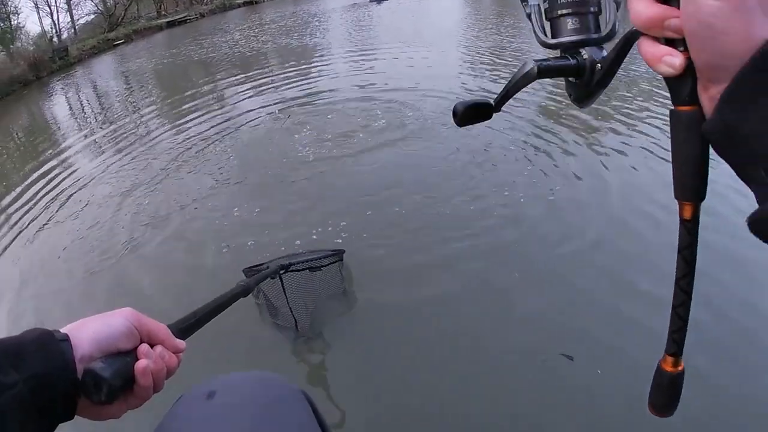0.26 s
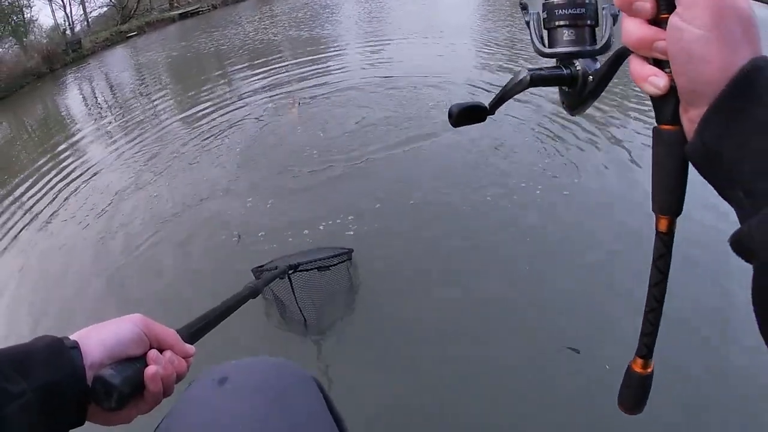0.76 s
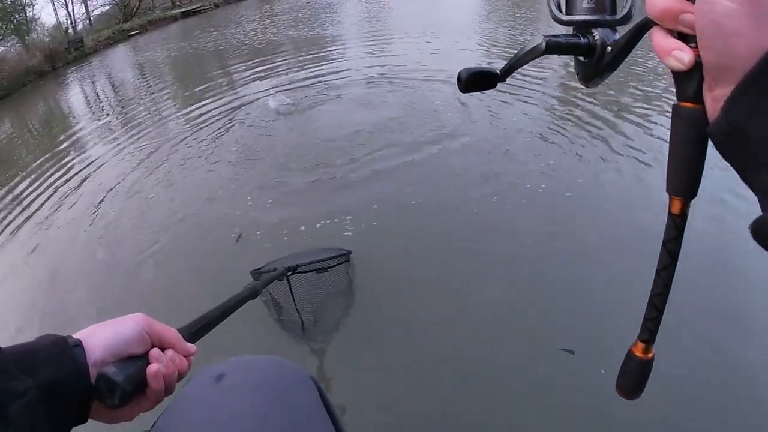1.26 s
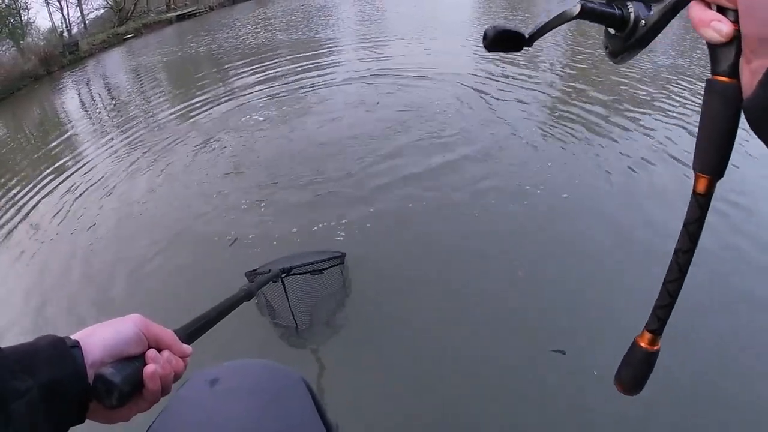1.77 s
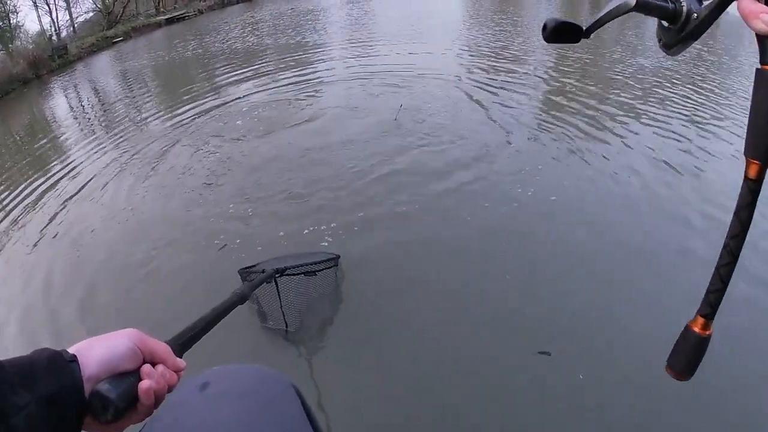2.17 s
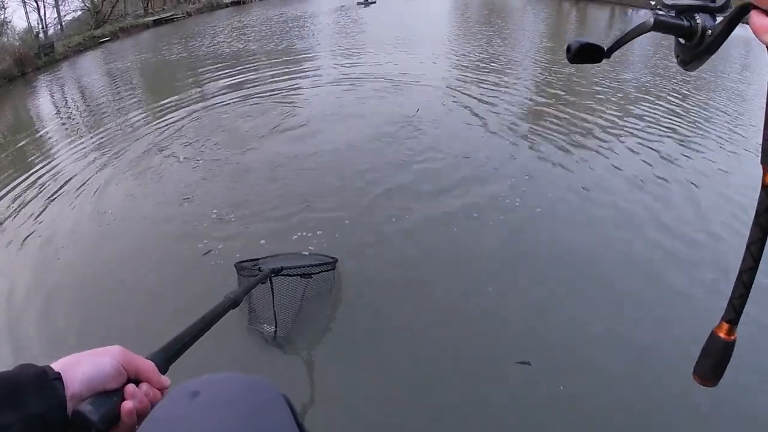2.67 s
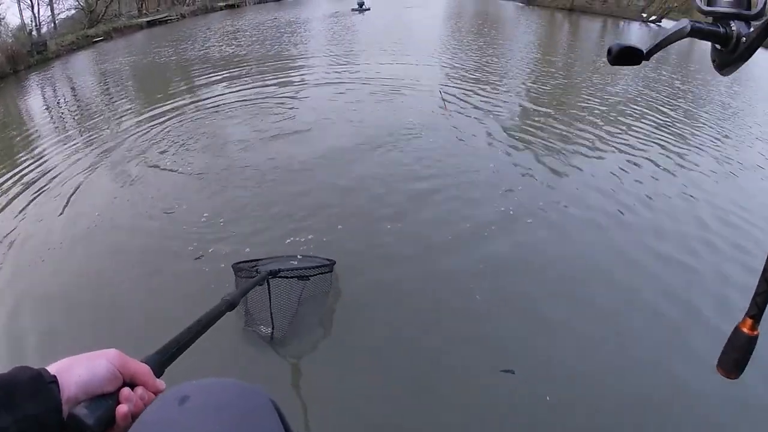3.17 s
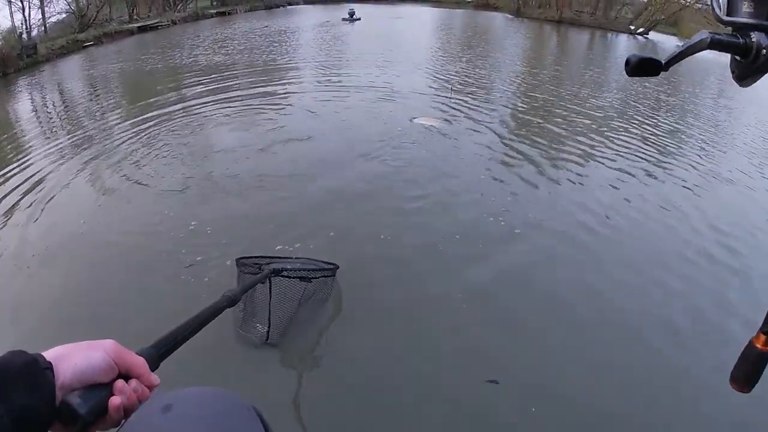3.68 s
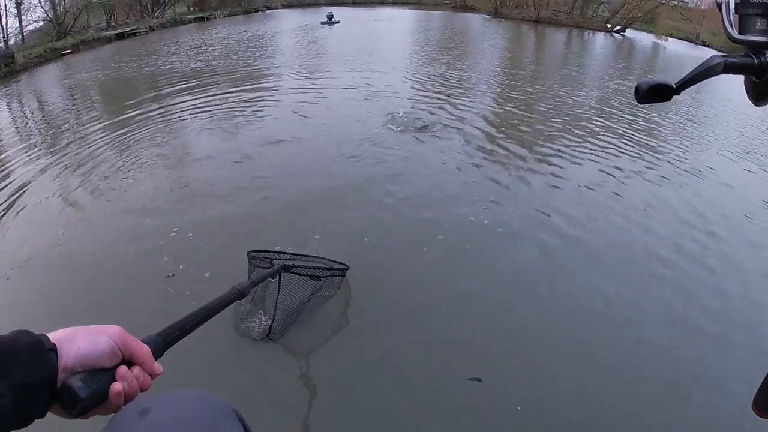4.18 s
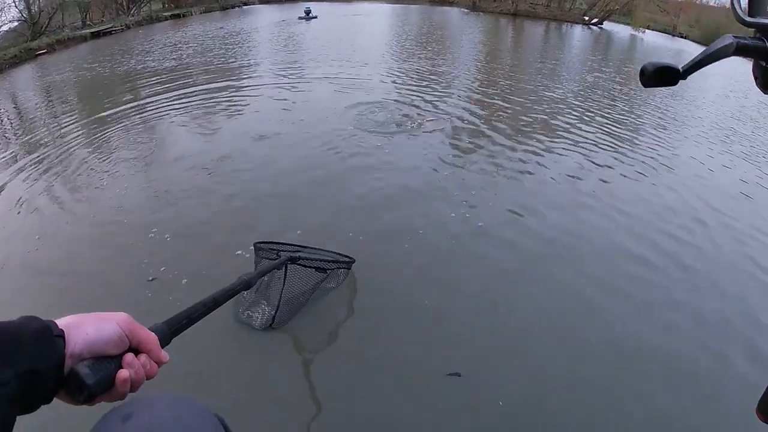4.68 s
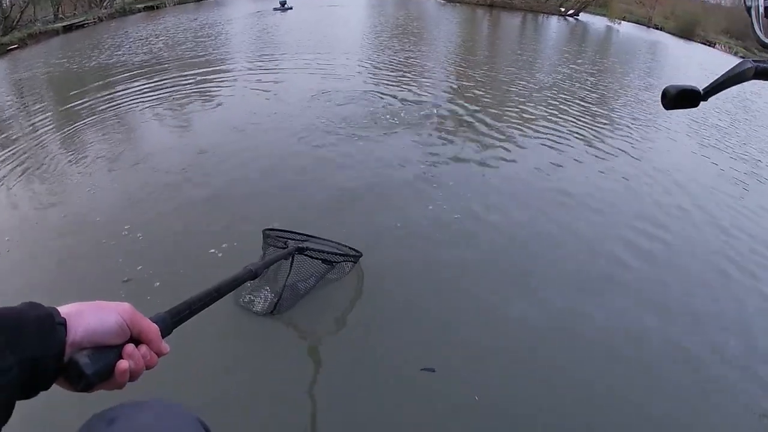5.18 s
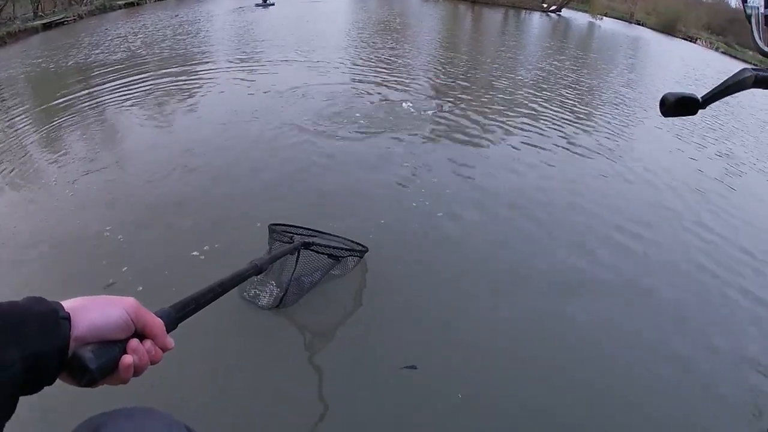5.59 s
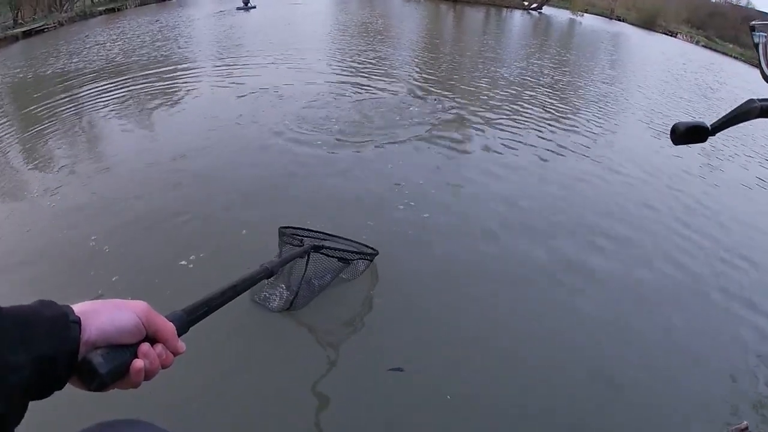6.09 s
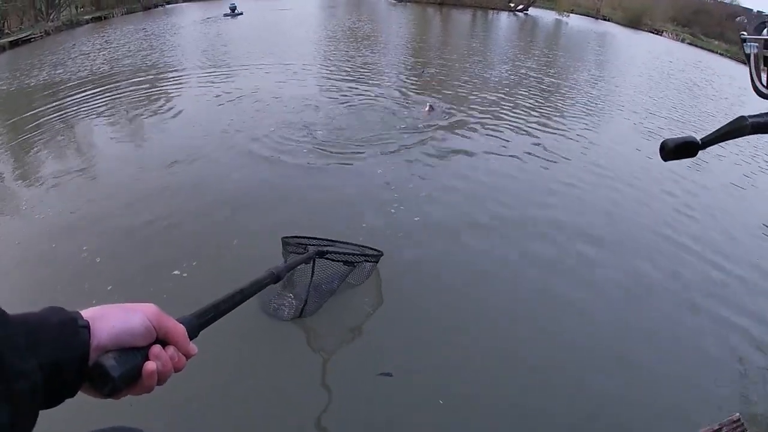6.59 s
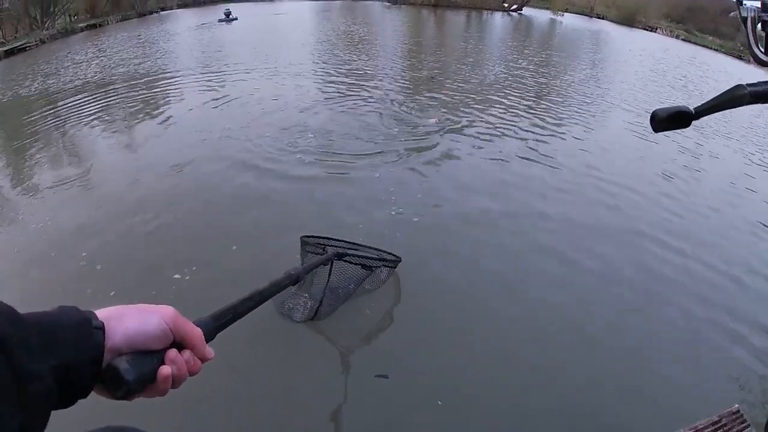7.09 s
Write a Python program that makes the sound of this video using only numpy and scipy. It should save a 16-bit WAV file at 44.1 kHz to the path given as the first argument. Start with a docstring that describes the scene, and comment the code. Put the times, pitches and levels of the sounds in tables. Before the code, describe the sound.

A hooked fish splashes at the surface of a lake, churning up bubbles and ticking drops, then gives one heavy slosh with deep glugs. In a lull, songbirds call faintly from the bank. The fish thrashes again in a run of sharp splashes, and as it settles, gusts buffet the microphone while birds whistle softly. Distant traffic drones and hisses throughout.

```python
"""A hooked fish thrashes at the surface of a lake, over the drone and hiss of a far road and light wind.
From the start, tail beats churn the water into ringing bubbles and spray, and drops tick back in.
At 1.5 s a heavy beat sloshes and big air pockets glug. In the lull, from 2.5 s, songbirds call
from the bank. The fish thrashes again from 4 s to 6 s; then gusts buffet the microphone
while a second bird whistles."""
import sys
import numpy as np
from scipy import signal
from scipy.fft import rfft, irfft, next_fast_len
from scipy.io import wavfile
from scipy.ndimage import uniform_filter1d, map_coordinates

SR = 44100
rng = np.random.default_rng(int(sys.argv[2]) if len(sys.argv) > 2 else 0)


def int16_out(signal):
    """Quantize to a 16-bit WAV file."""
    q = np.round(np.clip(np.atleast_2d(signal).T, -1, 1) * 32767)
    wavfile.write(sys.argv[1], SR, q.astype(np.int16))


N = 323694
TIME_S = np.arange(N) / SR


def amp(db):
    return 10 ** (np.asarray(db) / 20)


def unit(x):
    return x / np.sqrt(np.mean(x ** 2) + 1e-20)


def sine(hz):
    return np.sin(2 * np.pi * np.cumsum(hz) / SR)


def curves(rows, outside=None):
    """Each column after t/s, interpolated per sample."""
    times_s, *columns = np.transpose(rows)
    return [np.interp(TIME_S, times_s, column, outside, outside) for column in columns]


def wobble(rate_hz):
    """Smooth random curve, rate_hz knots a second."""
    knots = rng.standard_normal(int(N * rate_hz / SR) + 4)
    return map_coordinates(knots, [TIME_S * rate_hz])


def coloured(x, spectrum):
    """Filter by (f/Hz, gain/dB) points on a log frequency axis."""
    size = next_fast_len(N + 8192)
    hz, db = np.transpose(spectrum)
    gain = amp(np.interp(np.log(np.fft.rfftfreq(size, 1 / SR) + 1), np.log(hz + 1), db))
    return irfft(rfft(x, size) * gain, size)[:N]


def rush(spectrum, patchy_db):
    """Coloured noise, rms 1, with random gain patches in time and frequency."""
    bins = signal.stft(rng.standard_normal(N + 512), nperseg=512)[2]
    patches = uniform_filter1d(rng.standard_normal(bins.shape), size=6, axis=0)
    patches = unit(uniform_filter1d(patches, size=14, axis=1))
    noise = signal.istft(bins * amp(patchy_db * patches), nperseg=512)[1][:N]
    return unit(coloured(noise, spectrum))


def steady(x, samples):
    """Even out the slow level, keep the grain."""
    return x / np.sqrt(np.abs(uniform_filter1d(x ** 2, size=samples)) + 0.028)


def place(start_s, waves):
    """Sum the rows of waves, each at its start time."""
    index = np.round(start_s * SR).astype(int)[:, None] + np.arange(waves.shape[1])
    return np.bincount(index.ravel(), waves.ravel(), N)[:N]


def bubbles(start_s, db, hz, cycles, rise, samples):
    """Damped sines, rising in pitch as they near the surface. One life = cycles to fall 26 dB."""
    db, hz, cycles, rise = (np.reshape(v, (-1, 1)) for v in (db, hz, np.maximum(cycles, 1), rise))
    lives = np.arange(samples) / SR * hz / cycles
    phase = 2 * np.pi * cycles * lives * (1 - rise / 4 + rise * np.minimum(lives, 1.5) / 2)
    envelope = np.exp(-3 * lives) * (1 - np.exp(-lives / 0.05))
    return place(start_s, amp(db) * envelope * np.sin(phase))


def swarm(spectrum, count, centre_hz, octaves, cycles, spread_db, samples, hiss):
    """Random bubbles of very unequal strength on some hiss, at an even level."""
    when, strength = rng.random((count, 2)).T
    pitch, life = rng.standard_normal((count, 2)).T
    hz = np.clip(centre_hz * 2 ** (octaves * pitch), 200, 16000)
    db = -spread_db * np.log(strength + 0.00037)
    crowd = unit(bubbles(when * N / SR, db, hz, cycles * 1.785 ** life, rise=0.46, samples=samples))
    return steady(unit(coloured(crowd + hiss * rng.standard_normal(N), spectrum)), samples=2000)


def surges(rows, linger_db, linger_s=0.47):
    """Gain per level column: build, fade, faint seething tail. Slopes in s per 20 dB, sign ignored."""
    peak_s, *db, build_s, fade_s = np.transpose(rows)
    grid_s = np.arange(0, N / SR + .01, .001)
    age_s = grid_s - peak_s[:, None]
    slope_s = np.abs(np.where(age_s < 0, build_s[:, None], fade_s[:, None]))
    surge = amp(-20 * np.abs(age_s) / np.maximum(slope_s, 1e-9))
    tail = (age_s > 0) * amp(-20 * np.abs(age_s) / linger_s)
    peak_power = amp(db) ** 2
    power = peak_power @ surge ** 2 + amp(linger_db)[:, None] ** 2 * (peak_power @ tail ** 2)
    return np.array([np.interp(TIME_S, grid_s, gain) for gain in np.sqrt(power)])


# Churned water spectra: f/Hz, gain/dB
FROTH_SPECTRUM = [(350, -8.5), (600, -6), (717, -10), (1090, -7.5), (1440, 0.5), (2070, -2), (2480, -13),
                  (2600, -2.5), (3380, -33), (5720, -120)]
SPRAY_SPECTRUM = [(1410, -33), (2400, -5), (2580, -37), (2840, -4.5), (3190, -1), (3850, -7), (4630, -10),
                  (6050, -2.5), (6840, -14), (7200, -12.5), (9360, -53), (15800, -120)]
MIST_SPECTRUM = [(4120, -47.5), (7000, 3), (7810, 6), (8640, -3.5), (9900, 1), (12000, -13), (14200, -13),
                 (15500, -36.5)]
# Tail beats: peak t/s, froth level/dB, spray level/dB, mist level/dB, build and fade/(s per 20 dB)
TAIL_BEATS = [(0.0, -48.5, -52, -76, .02, 0.23), (0.07, -53.5, -45.5, -60, -0.1, 0.1568),
              (0.165, -49.5, -58, -62, .15, 0.17), (0.285, -58, -62, -82.5, 0.17, 0.2),
              (0.67, -59.5, -72.5, -80.5, 0.84, 0.7), (0.83, -55.5, -65, -83, 0.09, 0.15),
              (1.378, -64.5, -61, -76, -0.1, 0.14), (1.396, -53, -60.5, -78, -0.04, 0.27),
              (1.45, -36, -49, -72, 0, 0.1865), (1.47, -36, -42, -64.5, 0.0146, 0.14),
              (1.554, -51.5, -45, -66, 0.02, 0.28), (1.598, -37.5, -49, -60, 0.04, 0.1171),
              (4.06, -34, -49, -71.5, 0.02, 0), (4.08, -42, -47, -60, 0.03, -0.04),
              (4.102, -37.5, -36.5, -58, 0.0362, 0.0333), (4.134, -41, -43.5, -63, 0.0552, -0.03),
              (4.166, -43, -45, -62, 0.1066, -0.02), (4.302, -46.5, -47, -69, 0.024, 0.04),
              (4.333, -55, -55, -72, 0.05, 0.13), (4.44, -54, -60.5, -74.5, 0.2, 0.5),
              (4.477, -48.5, -48, -62, .03, .015), (4.72, -60.5, -65, -84, 0.25, -0.5),
              (4.768, -53, -77.5, -80, -0.16, .3), (4.842, -45, -53, -77, 0.0648, 0.12),
              (5.154, -41.5, -51, -68, 0.11, 0.01), (5.3, -54, -56, -70.5, .5, 0.2),
              (5.37, -56, -59.5, -72, -0.07, -0.02), (5.45, -52, -55.5, -63, -0.04, 0.0772),
              (5.474, -36, -44.5, -73, -0.01, 0.0539), (5.586, -46, -58, -72.5, 0.18, 0.1159),
              (5.64, -48, -51, -69.5, .012, .06), (5.93, -57.5, -69, -76.5, 0.33, 0.25),
              (6.042, -57.5, -69.5, -82.5, 0.34, .5), (6.364, -57, -72, -91, -0.1, 0.18)]


def tail_beats(spatter_db=3, spatter_hz=35):
    """Each beat churns up froth; spray and mist fall in uneven handfuls."""
    froth = swarm(FROTH_SPECTRUM, count=6000, centre_hz=1309, octaves=0.7112, cycles=10.5,
                  spread_db=3, samples=700, hiss=1.1)
    spray = swarm(SPRAY_SPECTRUM, count=14000, centre_hz=4500, octaves=.7, cycles=8,
                  spread_db=2.8, samples=140, hiss=.7)
    mist = swarm(MIST_SPECTRUM, count=14000, centre_hz=10000, octaves=.5, cycles=4,
                 spread_db=2.5, samples=60, hiss=.7)
    spatter = unit(amp(spatter_db * wobble(spatter_hz)))
    froth_gain, spray_gain, mist_gain = surges(TAIL_BEATS, linger_db=[-18, -22, -20])
    return froth_gain * froth + spatter * (spray_gain * spray + mist_gain * mist)


# Hiss near 2 kHz: t/s, level/dB
HISS_LEVEL = [(0, -56.5), (.8, -81.5), (2.6, -66.5), (3.6, -76), (4.3, -69), (4.8, -76), (4.9, -52),
              (5.3, -59.5), (5.7, -65), (7, -81.5), (7.15, -65.5), (7.34, -69)]


def swelling_hiss():
    """Hiss near 2 kHz that swells and fades, like passing tyres."""
    spectrum = [(900, -120), (1300, -17.5), (1900, 0), (2400, -9), (3500, -120)]
    return amp(curves(HISS_LEVEL)[0]) * rush(spectrum, patchy_db=3.5)


# Road spectra: f/Hz, gain/dB
DRONE_SPECTRUM = [(24, -59), (40, -28.5), (76, -0.5), (108, -4), (151, -1), (244, -9.5), (277, -12.5),
                  (515, -27.5), (650, -34), (840, -75), (1430, -120)]
TYRE_SPECTRUM = [(260, -30), (450, 4), (514, -7), (771, 5.5), (840, 6), (1370, 3.5), (1600, 2), (2700, -17),
                 (2900, -26.5), (3770, -61.5), (6380, -120)]
AIR_SPECTRUM = [(1410, -8.5), (2400, -9), (2940, -4), (3310, -9), (4810, -5.5), (5670, -4), (6480, -3),
                (8510, -17), (9950, -17), (12300, -30), (13300, -36), (15500, -56)]
# Traffic: t/s, tyre level/dB, air level/dB
TRAFFIC_LEVELS = [(0, -58.5, -66), (.4, -55, -68), (1.1, -60.5, -69.5), (1.9, -60, -70.5),
                  (2.66, -58, -72.5), (3.37, -60, -73), (3.7, -58, -74), (4.25, -60, -72.5),
                  (4.6, -57, -71.5), (5.6, -57, -70.5), (6.35, -56.5, -72), (6.7, -61.5, -71.5),
                  (7.34, -57, -73)]


def road(drone_db=-46):
    """Far traffic: low drone, tyre hiss, faint air above."""
    tyre_db, air_db = curves(TRAFFIC_LEVELS)
    drone = amp(drone_db + 0.4 * wobble(3.11)) * rush(DRONE_SPECTRUM, patchy_db=0.66)
    tyres = amp(tyre_db + 0.35 * wobble(6)) * rush(TYRE_SPECTRUM, patchy_db=1.46)
    air = amp(air_db + 1.14 * wobble(4)) * rush(AIR_SPECTRUM, patchy_db=2.0)
    return drone + tyres + air


# Engine note: t/s, level/dB
ENGINE_LEVEL = [(0, -39.5), (.7, -42), (1.1, -40.5), (1.55, -39.5), (2.02, -52.5), (2.44, -47),
                (3.2, -56.5)]


def leaving_engine(start_hz=76.4, sag_hz_per_s=1.106):
    """A far engine note that sinks as it leaves."""
    db, = curves(ENGINE_LEVEL, outside=-90)
    return amp(db + 2.2 * wobble(8.05)) * sine(start_hz - sag_hz_per_s * TIME_S + 0.59 * wobble(4.9))


# Buffeting: t/s, level/dB
WIND_LEVEL = [(0.0, -52.5), (0.63, -54), (0.67, -59), (1.12, -41.5), (1.68, -57), (2.39, -53),
              (2.43, -40.5), (2.64, -56.5), (2.82, -49), (2.88, -59.5), (4.95, -54), (5.21, -63),
              (5.25, -48.5), (5.33, -64), (5.42, -50.5), (5.91, -43.5), (5.97, -32), (6.01, -48.5),
              (6.13, -36), (6.17, -45), (6.27, -27), (6.36, -38.5), (6.54, -26), (6.58, -37.5), (6.81, -45),
              (6.93, -39), (7.16, -56.5), (7.2, -42), (7.28, -59.5), (7.34, -46)]
# Buffeting spectrum: f/Hz, gain/dB
WIND_SPECTRUM = [(8, -55), (16, 8), (45, 17.5), (65, 14.5), (100, -52.5), (200, -150)]


def wind():
    """Lumpy pressure on the microphone port."""
    gain = amp(curves(WIND_LEVEL)[0] + 1.2 * wobble(12))
    return gain * steady(rush(WIND_SPECTRUM, patchy_db=2.0), samples=5000)


def cracks(start_s, db, spectrum, decay_s=.001):
    """Short bursts of coloured noise."""
    envelope = amp(db)[:, None] * np.exp(-TIME_S[:200] / decay_s)
    return coloured(place(start_s, envelope * rng.standard_normal(envelope.shape)), spectrum)


# Drops: t/s, ring level/dB, f/Hz, crack level/dB before filtering
DROP_TICKS = [(0.0144, -37, 3430, -39), (0.0528, -41, 3160, -43), (0.0706, -26.5, 3240, -22.5),
              (0.1388, -33.5, 5970, -37), (0.171, -34, 5800, -36.5), (0.2206, -44, 3200, -47.5),
              (0.2796, -43, 2930, -49.5), (0.3517, -44, 2949, -40), (0.39, -48, 3310, -52),
              (0.4214, -52, 3290, -52), (0.4574, -47, 3070, -48), (1.0607, -47.5, 5290, -52),
              (1.3724, -29.5, 5460, -32), (1.3942, -36, 3186, -44), (1.4591, -35.5, 3330, -36),
              (1.472, -21, 3160, -29.5), (1.5519, -34.5, 3250, -41), (1.568, -25, 3200, -32),
              (1.578, -30, 3450, -40), (1.62, -31.5, 2917, -39), (1.6725, -34.5, 5760, -37),
              (1.728, -40, 6040, -44), (1.7598, -41, 3570, -38), (1.844, -38, 6000, -45.5),
              (1.879, -46, 3740, -37), (1.9616, -47, 2560, -42), (4.0524, -39, 5190, -40),
              (4.0587, -39, 3218, -39.5), (4.0784, -26.5, 3580, -31), (4.0979, -21.5, 2840, -33),
              (4.104, -28, 3700, -40), (4.1324, -24.5, 3256, -33.5), (4.3018, -26.5, 2850, -35),
              (4.3301, -34, 3240, -36), (4.338, -40, 6000, -40), (4.366, -45, 2790, -34),
              (4.4054, -42.5, 2700, -39), (4.453, -37, 3470, -42), (4.465, -31.5, 5950, -38.5),
              (4.4769, -28, 2732, -20.5), (4.5871, -50.5, 3400, -37.5), (4.6444, -40, 4310, -36),
              (4.7907, -38, 5722, -35), (4.821, -39, 5560, -37), (4.836, -23, 5500, -25),
              (4.8814, -41, 2800, -48.5), (5.045, -33.5, 2800, -48), (5.1233, -44.5, 3330, -45),
              (5.159, -34, 6260, -28.5), (5.199, -40, 3180, -30.5), (5.2168, -31, 3940, -24.5),
              (5.277, -36, 4460, -35.5), (5.293, -41, 3370, -21), (5.3675, -47, 2780, -47),
              (5.446, -26.5, 5805, -43), (5.473, -33, 4240, -28.5), (5.5491, -37, 2670, -37),
              (5.5713, -38, 2980, -32), (5.6388, -34, 2780, -30), (5.7736, -41, 5500, -41),
              (5.8344, -46, 3400, -52.5), (5.898, -44, 5857, -37), (5.927, -49, 4230, -55),
              (6.002, -50.5, 5400, -58), (6.031, -43.5, 2660, -40), (6.1096, -43.5, 2840, -42),
              (6.2537, -50, 6000, -56.5), (6.576, -43, 2910, -55), (6.7303, -50, 6400, -49),
              (6.8908, -31, 5530, -50), (6.891, -39, 4570, -55), (6.901, -44.5, 4440, -58),
              (7.1545, -48.5, 4600, -41)]


def drop_ticks():
    """A drop hits the surface: a treble crack and a small ringing bubble."""
    start_s, ring_db, hz, crack_db = np.transpose(DROP_TICKS)
    rings = bubbles(start_s, ring_db, hz, cycles=14.6, rise=.14, samples=400)
    return rings + cracks(start_s, crack_db, SPRAY_SPECTRUM)


# Finest droplets: t/s, level/dB before filtering
DROPLET_SPITS = [(0.0463, -50), (0.0767, -42), (0.108, -34.5), (0.1387, -38), (0.1905, -40),
                 (1.5673, -47.5), (1.5958, -48.5), (1.6252, -46.5), (1.6367, -50.5), (1.728, -43),
                 (4.0805, -40), (4.1026, -44), (4.14, -42), (4.3006, -52.5), (4.4119, -53), (4.4523, -51),
                 (4.4643, -36), (4.5865, -56.5), (4.7905, -52), (5.1316, -46), (5.1567, -49),
                 (5.225, -42.5), (5.2535, -51.5), (5.2919, -53), (5.3678, -52), (5.447, -45),
                 (5.4735, -49.5), (5.732, -49)]


def droplet_spits():
    """The finest droplets burst in the high treble."""
    return cracks(*np.transpose(DROPLET_SPITS), MIST_SPECTRUM)


# Single bubbles: t/s, level/dB, f/Hz, life/cycles
AIR_POCKETS = [(0.061, -34, 1977, 14.2), (0.131, -33, 1720, 13), (0.261, -35, 1376, 10),
               (0.28, -35.5, 1360, 19), (0.674, -38, 1720, 17.6), (0.827, -43, 1980, 27),
               (0.893, -42.5, 1800, 15.2), (1.174, -35, 1480, 3.3), (1.386, -37.5, 1690, 18),
               (1.398, -30.5, 1270, 11), (1.454, -33, 1380, 10), (1.466, -24.5, 451, 16),
               (1.471, -25.5, 1500, 10.7), (1.519, -25, 364, 14), (1.591, -25, 1670, 11),
               (1.594, -28.5, 437, 15), (1.685, -35.5, 403.6, 13.5), (1.818, -35.5, 1647, 9),
               (3.916, -40, 1180, 20), (4.0587, -17.5, 1520, 6.6), (4.059, -19, 863, 9.3),
               (4.079, -30, 2150, 10), (4.094, -21.5, 1470, 11), (4.104, -28, 219, 14),
               (4.13, -23.5, 1700, 8), (4.14, -10, 2021, 12.4), (4.146, -30.5, 205, 11.3),
               (4.149, -17, 1300, 3.64), (4.209, -39.5, 2140, 15.4), (4.27, -39, 1940, 13),
               (4.302, -35, 1340, 15), (4.398, -40, 2400, 8), (4.404, -38.5, 2250, 20),
               (4.441, -38.5, 1953, 14), (4.444, -37.5, 860, 11.6), (4.478, -23, 422, 22.9),
               (4.563, -42.5, 2200, 12), (4.627, -40.5, 1640, 15), (4.721, -42.5, 2270, 22.5),
               (4.77, -36, 790.7, 31), (4.813, -19.5, 333, 8.5), (4.817, -36, 1200, 12),
               (4.836, -30, 1346, 11), (4.907, -37, 1860, 16), (5.137, -34, 586, 17),
               (5.153, -30.5, 1260, 16), (5.25, -36, 1970, 13), (5.286, -36, 1493, 26),
               (5.369, -33, 1740, 12), (5.447, -32, 1346, 10), (5.473, -13.5, 296, 4.77),
               (5.473, -26, 750, 7.3), (5.49, -31, 315, 15), (5.506, -36.5, 1750, 10.5),
               (5.523, -33.5, 1440, 18), (5.506, -38, 854, 31.7), (5.584, -23.5, 1200, 4.7),
               (5.59, -33.5, 1170, 12), (5.658, -33.5, 2180, 16), (5.765, -40, 1460, 16),
               (5.898, -40, 2030, 10), (5.946, -29.5, 281.5, 16.24), (5.95, -34.5, 1370, 13),
               (6.033, -32.5, 1229, 6), (6.201, -40, 1178, 23), (6.341, -36.5, 1310, 23.4),
               (7.046, -40, 1370, 9.3)]


def air_pockets(rise_at_1khz=.18, rise_per_octave=-0.057):
    """Trapped air rings, from deep glugs to plinks; big bubbles climb more in pitch."""
    start_s, db, hz, cycles = np.transpose(AIR_POCKETS)
    rise = rise_at_1khz + rise_per_octave * np.log2(hz / 1000)
    return bubbles(start_s, db, hz, cycles, rise, samples=5000)


def glides(notes, quiver_hz, pointed=False):
    """Unsteady whistles. Pitch: a parabola through three values, or a pointed arch on the first two."""
    out = np.zeros(N + SR)
    drift_hz = np.pad(quiver_hz * wobble(150), (0, SR))
    for start_s, length_s, start_hz, mid_hz, end_hz, db in notes:
        u = np.arange(int(length_s * SR)) / (length_s * SR)
        first = round(start_s * SR)
        span = slice(first, first + len(u))
        if pointed:
            hz = start_hz + (mid_hz - start_hz) * np.sin(np.pi * u) ** 1.7
        else:
            hz = start_hz * (1 - u) * (1 - 2 * u) + 4 * mid_hz * u * (1 - u) + end_hz * u * (2 * u - 1)
        envelope = amp(db) * np.sqrt(2 * np.sin(np.pi * u))
        out[span] += envelope * sine(hz + drift_hz[span])
    return out[:N] * amp(2.5 * wobble(80))


# Long bubbles: t/s, length/s, start f/Hz, middle f/Hz, end f/Hz, level/dB
BUBBLE_SQUEAKS = [(.58, 0.093, 3400, 3660, 4530, -69.5), (1.755, 0.052, 3420, 3717, 4088, -58.5),
                  (1.79, 0.0387, 880.5, 1247, 1570, -57.5), (1.805, .02, 3400, 3650, 3850, -63),
                  (4.262, 0.031, 1310, 1980, 2800, -61.5), (5.515, 0.046, 340, 400, 520, -47),
                  (5.548, 0.034, 880, 1100, 1607, -49), (5.684, 0.022, 1140, 1790, 3000, -56)]


def bubble_squeaks():
    """Long rising bubbles squeak upward."""
    return glides(BUBBLE_SQUEAKS, quiver_hz=10.1)


# Slosh spectrum: f/Hz, gain/dB
SLOSH_SPECTRUM = [(120, -120), (220, -15), (320, 1), (450, 1), (600, -3.5), (800, -19.5), (1500, -120)]
# Stronger beats: peak t/s, level/dB, fade/(s per 20 dB)
SLOSH_BEATS = [(1.478, -30.5, .15), (1.62, -47, 0.09), (4.062, -46.5, 0.25), (4.148, -41.5, 0.13),
               (4.48, -46, .04), (4.815, -44, .04), (5.14, -50, .04), (5.476, -42, .08)]


def slosh(build_s=.018):
    """The stronger beats heave up a crowd of big, low bubbles."""
    crowd = swarm(SLOSH_SPECTRUM, count=900, centre_hz=399, octaves=0.355, cycles=12.53,
                  spread_db=4.0, samples=1600, hiss=1.1)
    beats = [(peak_s, db, build_s, fade_s) for peak_s, db, fade_s in SLOSH_BEATS]
    return surges(beats, linger_db=[-35])[0] * crowd


# Other engines: start t/s, end t/s, f/Hz, level/dB
ENGINE_HUMS = [(1.895, 2.5, 166.3, -50.5), (2.897, 4.0, 146.1, -53), (3.394, 4.025, 236.9, -51.5),
               (4.298, 5.2, 167, -46.5)]


def engine_hums(fade_s=0.16):
    """Far engine notes fade in, waver and fade out."""
    out = np.zeros(N)
    for start_s, end_s, hz, db in ENGINE_HUMS:
        fade = np.clip(np.minimum(TIME_S - start_s, end_s - TIME_S) / fade_s, 0, 1)
        out += fade * amp(db + 1.5 * wobble(8)) * sine(hz + 1.52 * wobble(4))
    return out


# Bird notes: t/s, length/s, start f/Hz, middle f/Hz, end f/Hz, level/dB
SONG_NOTES = [ (2.55, .055, 3350, 3600, 3950, -77), (2.74, .025, 4400, 4700, 5000, -71),
              (2.79, .07, 3400, 3300, 3250, -75), (2.8, .048, 4200, 4380, 4480, -70),
              (2.875, .02, 4500, 4900, 5150, -69), (2.895, .048, 3450, 3720, 4050, -63),
              (2.94, .03, 3600, 3650, 3900, -68), (2.97, .05, 3900, 3400, 3250, -74),
              (3.06, .04, 2900, 3400, 3620, -68), (3.09, .125, 3630, 3630, 3630, -69),
              (3.055, .045, 3500, 4200, 4450, -68), (3.18, .07, 4300, 4200, 3850, -74),
              (3.318, .037, 4450, 4550, 4400, -63), (3.305, .06, 3600, 3900, 4000, -76),
              (3.47, .055, 4350, 4000, 3550, -65), (3.52, .02, 3200, 3000, 2850, -70),
              (3.64, .07, 3250, 3150, 3000, -73), (3.76, .052, 4200, 3950, 3700, -62),
              (3.81, .034, 3450, 3100, 2650, -61), (3.878, .02, 2800, 3000, 3200, -68),
              (6.033, .065, 3250, 3600, 3300, -66), (6.18, .07, 2350, 2050, 1800, -67),
              (6.408, .095, 3400, 3700, 3600, -65), (6.465, .035, 3700, 3950, 4000, -69),
              (6.51, .04, 3350, 3300, 3200, -74), (6.59, .05, 3700, 4000, 3900, -77),
              (6.688, .05, 2350, 2100, 1850, -64), (7.21, .04, 2350, 2150, 1950, -67)]


def songbird():
    """Quick gliding whistles from the bank."""
    return glides(SONG_NOTES, quiver_hz=45)


def tree_echo(calls, rt60_s=.25, level_db=-7):
    """The trees return a short smear of echoes."""
    tail = rng.standard_normal(SR // 2) * amp(-60 * TIME_S[:SR // 2] / rt60_s)
    return amp(level_db) * signal.fftconvolve(calls, tail / np.linalg.norm(tail))[:N]


# Far birds: t/s, level/dB
CHORUS_LEVEL = [(2.55, -81), (2.86, -78), (3.064, -68), (3.31, -76), (3.6, -71.5), (3.87, -66.5),
                (4.04, -70.5), (4.2, -81)]


def far_chorus():
    """Many far birds blur into patchy noise."""
    spectrum = [(1800, -120), (2500, -28.5), (3000, -8.5), (3700, -2), (4200, -1), (5200, -27),
                (7000, -120)]
    return amp(curves(CHORUS_LEVEL, outside=-140)[0]) * rush(spectrum, patchy_db=5)


# Strong gusts: t/s, flutter level/dB, top edge level/dB
GUST_LEVELS = [(5.7, -53, -56), (5.72, -53, -69), (5.892, -46, -53), (5.942, -38, -42.5),
               (6.144, -53.5, -57.5), (6.172, -29, -42.5), (6.22, -27.5, -31.5), (6.394, -40, -53),
               (6.536, -28, -42.5), (6.596, -41.5, -59), (6.652, -38.5, -47), (6.75, -53.5, -73),
               (6.818, -32.5, -42), (6.862, -47.5, -57), (6.934, -38.5, -49), (6.964, -51.5, -68),
               (7.004, -41, -50), (7.048, -50, -61.5), (7.072, -38, -58), (7.15, -65.5, -66)]


def gusts():
    """Strong gusts reach higher: flutter on the port, with a flickering top edge."""
    flutter_db, edge_db = curves(GUST_LEVELS, outside=-80)
    flutter_spectrum = [(50, -37), (75, 14), (120, 10), (170, -1), (230, -58.5), (500, -150)]
    edge_spectrum = [(130, -56), (185, 2), (270, -11), (450, -21.5), (700, -53), (1500, -150)]
    flutter = steady(rush(flutter_spectrum, patchy_db=1.14), samples=2500)
    edge = unit(amp(4.7 * wobble(40)) * rush(edge_spectrum, patchy_db=0))
    return amp(flutter_db + 1.51 * wobble(22)) * flutter + amp(edge_db) * edge


# Arched whistles: t/s, foot f/Hz, peak f/Hz, level/dB
ARCHED_NOTES = [(5.952, 2350, 2980, -64), (6.333, 2350, 2950, -62.5), (6.826, 2245, 3050, -64)]


def second_bird(length_s=.09):
    """An up-and-down whistle."""
    notes = [(start_s, length_s, foot, peak, foot, db) for start_s, foot, peak, db in ARCHED_NOTES]
    return glides(notes, quiver_hz=25, pointed=True)


# Pressure jolts: t/s, peak level/dB, width/s
WIND_JOLTS = [(6.173, -35.5, 0.0019), (6.2, -23.5, 0.0013), (6.425, -28.5, 0.001), (6.516, -26.5, 0.0012),
              (6.637, -39, 0.001084), (6.812, -34, 0.00093), (6.889, -37, 0.00094)]


def wind_jolts():
    """Single jolts on the port, each a push between two dips."""
    out = np.zeros(N)
    for start_s, db, width_s in WIND_JOLTS:
        u = (TIME_S - start_s) / width_s - 3
        out += amp(db) * (1 - u * u) * np.exp(-u * u / 2)
    return out


def scene():
    """Water, traffic, birds and wind, in mono."""
    water = tail_beats()
    hiss = swelling_hiss()
    water += drop_ticks() + droplet_spits() + air_pockets() + bubble_squeaks() + slosh()
    traffic = road() + leaving_engine() + engine_hums()
    calls = songbird() + second_bird()
    birds = calls + tree_echo(calls) + far_chorus()
    buffeting = wind() + gusts() + wind_jolts()
    return (water + hiss + traffic + birds + buffeting)[None]


def record(dry):
    """The camera keeps nothing above its band limit."""
    limit_hz = 15690
    size = next_fast_len(N + 8192)
    passband = np.fft.rfftfreq(size, 1 / SR) < limit_hz
    return irfft(rfft(dry, size) * passband, size)[:, :N]


dry = scene()
out = record(dry)
int16_out(out)
```